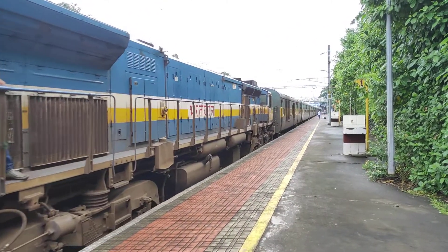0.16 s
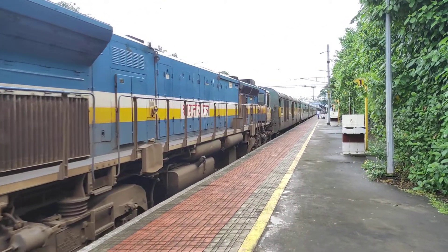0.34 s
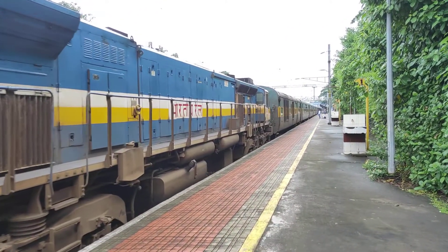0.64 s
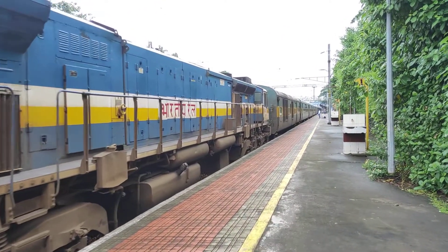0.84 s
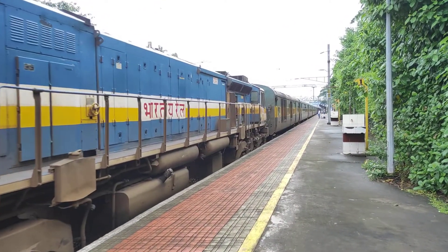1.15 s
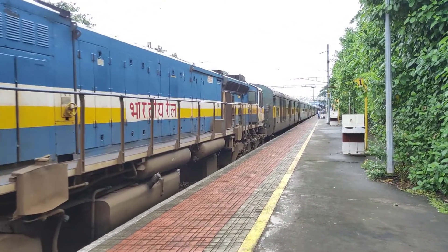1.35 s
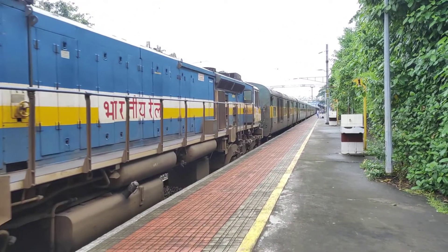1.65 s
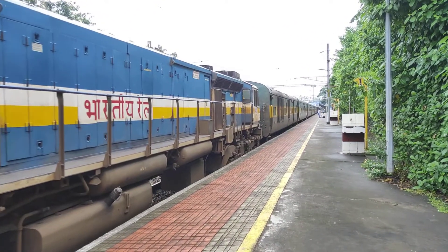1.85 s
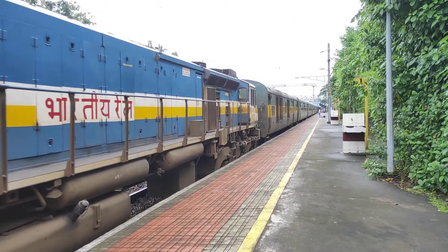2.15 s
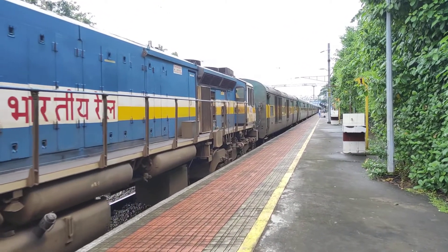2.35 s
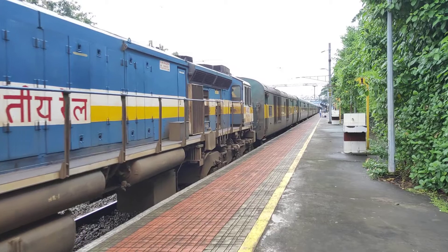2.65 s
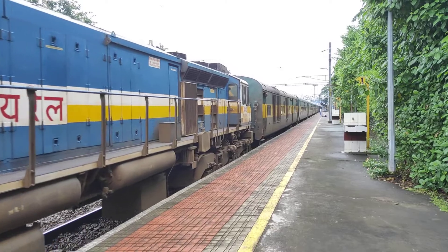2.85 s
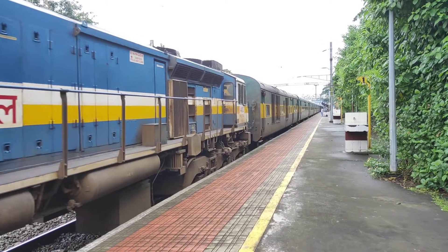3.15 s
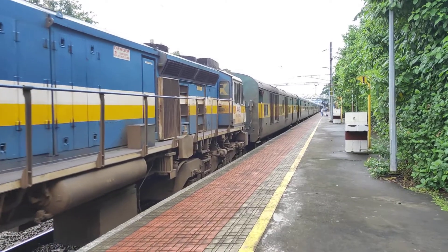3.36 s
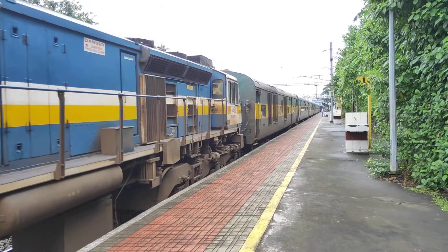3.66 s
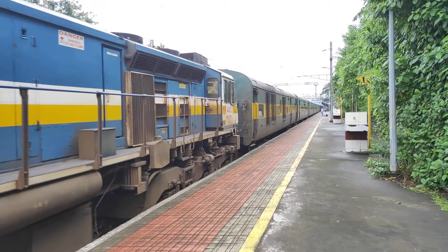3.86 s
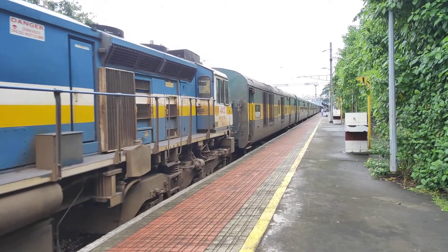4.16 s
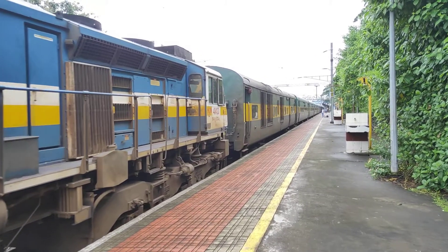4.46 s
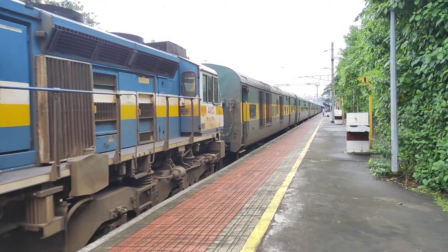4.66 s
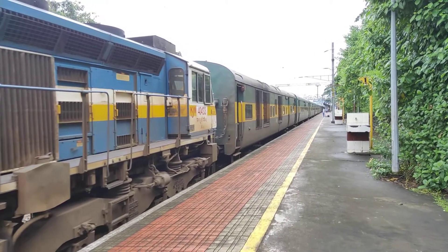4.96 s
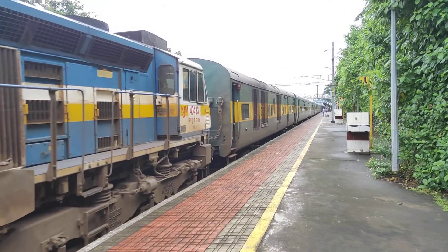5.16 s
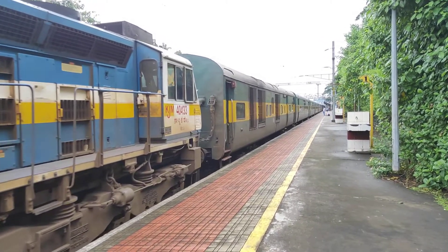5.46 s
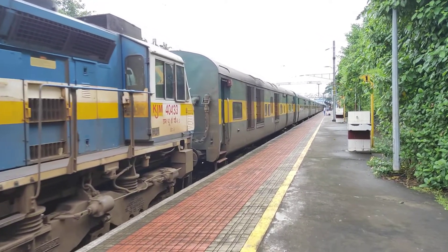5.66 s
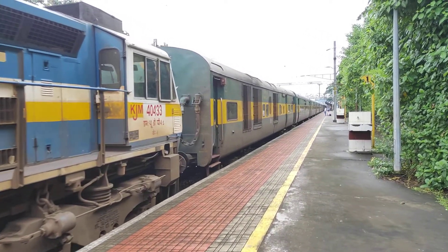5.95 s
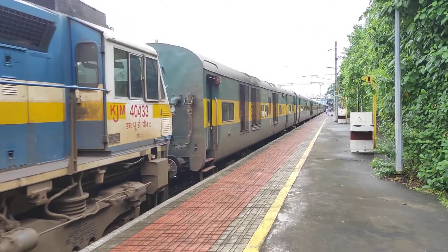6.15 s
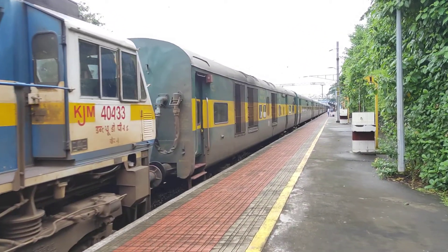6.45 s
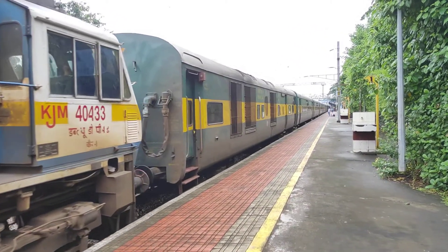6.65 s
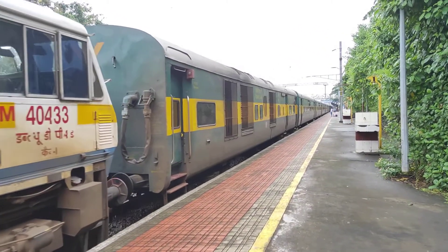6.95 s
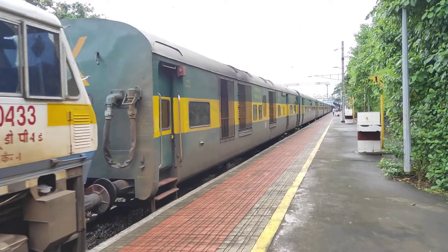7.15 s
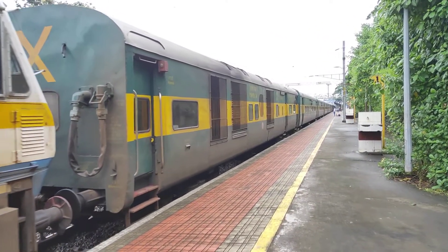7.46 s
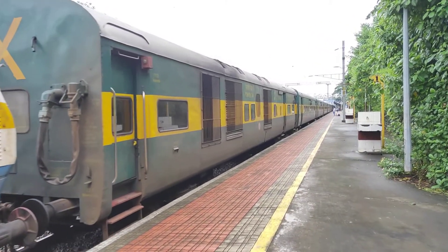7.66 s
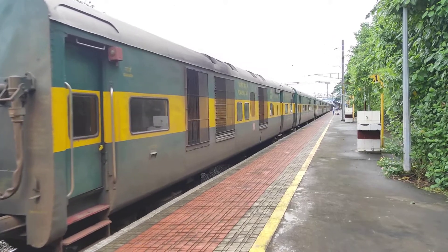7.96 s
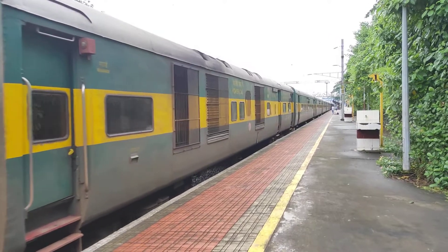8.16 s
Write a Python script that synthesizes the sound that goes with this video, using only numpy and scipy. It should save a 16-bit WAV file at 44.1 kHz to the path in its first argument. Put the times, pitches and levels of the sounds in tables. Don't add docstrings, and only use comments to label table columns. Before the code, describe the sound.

Outdoors on a platform, a phone held close hears a big diesel locomotive pull slowly past. Deep exhaust booms and thick engine roar rev up for about a second, then sink. A breathy high turbo whine follows the same pitch, with grinding running gear and rushing fan air. Late on, a sharp gear whistle flares in bursts after a tiny air puff, and the roar thins.

```python
import sys
import numpy as np
from scipy import signal
from scipy.fft import rfft, irfft, next_fast_len
from scipy.io import wavfile
from scipy.ndimage import uniform_filter1d, map_coordinates

SR = 44100
rng = np.random.default_rng(int(sys.argv[2]) if len(sys.argv) > 2 else 0)


def store_pcm(level_fs):
    pcm = np.round(np.clip(level_fs, -1, 1) * 32767).astype(np.int16)
    wavfile.write(sys.argv[1], SR, np.atleast_2d(pcm).T)


def volts_from_db(level):
    exponent = np.asarray(level, float) / 20
    return 10 ** exponent


N = 366471
T = np.arange(N) / SR
SIZE = next_fast_len(N)
BINS_HZ = np.maximum(np.fft.rfftfreq(SIZE, 1 / SR), 1)


def curves(table):
    s, *columns = np.transpose(table)
    return [np.interp(T, s, c) for c in columns]


def on_bins(table):
    hz, value = np.transpose(table)
    return np.interp(np.log(BINS_HZ), np.log(hz), value)


def walk(rate):
    held = int(SR / rate)
    levels = np.repeat(rng.standard_normal(N // held + 2), held)
    return 1.49 * uniform_filter1d(uniform_filter1d(levels, held), held)[:N]


def bump(at, lasting, order=2):
    return np.exp(-np.abs((T - at) / lasting) ** order)


def swells(rows, floor_db, order=2):
    return volts_from_db(floor_db) + sum(volts_from_db(db) * bump(at, lasting, order) for at, lasting, db in rows)


def passing(rows):
    return 10 * np.log10(sum(volts_from_db(db) ** 2 / (1 + ((T - at) / reach) ** 2) for at, reach, db in rows))


def tone(turns, width_hz, steady, like):
    pole = np.exp(-2 * np.pi * width_hz / SR)
    noise = rng.standard_normal((2, N + SR)) + 1j * rng.standard_normal((2, N + SR))
    noise = signal.lfilter([1], np.poly([pole, pole]), noise)[:, SR:]
    noise = noise / np.sqrt(np.mean(np.abs(noise) ** 2))
    steady, like = np.clip([steady, like], 0, 1)
    noise[0] = like * noise[1] + np.sqrt(1 - like ** 2) * noise[0]
    start = np.exp(2j * np.pi * rng.random())
    envelope = steady * start + np.sqrt(1 - steady ** 2) * noise
    return np.sqrt(2) * np.real(envelope * np.exp(2j * np.pi * turns))


def roar(colour, db, flicker_db, rate):
    # f/Hz, share [0-1]
    port_likeness = [(60, .99), (200, .96), (350, .9), (600, .75), (1000, .4), (1500, .45), (2200, .3),
                     (3000, .3), (5000, .1)]
    right, other = rfft(rng.standard_normal((2, SIZE))) * volts_from_db(on_bins(colour))
    like = np.clip(on_bins(port_likeness), 0, 1)
    both = np.array([like * right + np.sqrt(1 - like ** 2) * other, right])
    octave = np.log2(BINS_HZ)
    lowest, highest = np.floor(np.log2(colour[0][0])), np.log2(colour[-1][0])
    out = 0
    for centre in np.arange(lowest, highest + .5, .5):
        share = np.clip(1 - np.abs(octave - centre) / .5, 0, 1)
        out = out + irfft(both * share, SIZE)[:, :N] * volts_from_db(flicker_db * walk(rate))
    return out / np.sqrt(np.mean(out[1] ** 2)) * volts_from_db(db)


def engine_cycles():
    # t/s, cycle rate f/Hz
    speed = [(0.0, 7.002), (0.25, 7.235), (0.5, 7.553), (0.75, 7.816), (1.0, 8.052), (1.25, 8.131),
             (1.5, 8.084), (2.0, 7.904), (2.5, 7.751), (3.0, 7.493), (4.5, 6.725), (5.0, 6.559),
             (5.5, 6.355), (6.0, 6.101), (6.5, 5.934), (7.0, 5.849), (7.5, 5.789), (8.25, 5.751)]
    return np.cumsum(curves(speed)[0]) / SR


def exhaust(cycle):
    # loudest at t/s, lasting/s, level/dB rms
    booms = [
        [(3.9, 0.7, -51)],
        [(0., 0.6, -29), (2.8, 1.6, -27.5), (5.4, 0.99, -35.5)],
        [(1.9, 2.5, -31.5), (5.8, 0.59, -38.5)],
        [(1.6, 2., -32)],
        [(1.2, 0.71, -23.5), (2.8, 0.64, -38.5), (4.15, .4, -28.5)],
        [(0., .5, -35), (1.6, .8, -33), (4.1, 1.4, -27)],
        [(.7, .7, -23), (6.5, 2.8, -33)],
        [(2., 1.2, -36)],
        [(0., 0.54, -17), (2.5, 0.85, -37), (4.8, 0.35, -45), (6.4, 0.37, -31), (7.4, 1.2, -22)],
        [(0., 1., -35), (6.8, 2.7, -36)],
        [(0., .4, -30), (1.25, 0.62, -24), (5.6, 0.89, -33), (8., 0.81, -28.5)],
        [(0., 0.69, -50)],
    ]
    out = 0
    for order, rows in enumerate(booms, 7):
        wobble = .05 * walk(2)
        gain = swells(rows, -50) * volts_from_db(0.39 * walk(2.18))
        out = out + gain * np.sqrt(2) * np.sin(2 * np.pi * (order * cycle + wobble + rng.random()))
    for order in range(19, 95):
        level_db = -43.5 - 0.078 * (order - 9.5) + 3.5 * walk(1.553)
        out = out + volts_from_db(level_db) * np.sin(2 * np.pi * (order * cycle + rng.random()))
    return out


def engine_bodies():
    # f/Hz, level/dB
    body_colour = [(30, -9), (45, -12.5), (80, -3.5), (150, 0.5), (250, -3), (400, -8.5), (560, -7.5),
                   (700, -1), (850, -7), (1100, -24), (1500, -59)]
    # abreast at t/s, reach/s, level/dB when abreast
    blocks = [
        (1.4, 1.29, -25),
        (5.4, 1.76, -24.5),
    ]
    return roar(body_colour, passing(blocks) + 2, 0.86, 6)


def turbocharger(cycle):
    # loudest at t/s, lasting/s, level/dB
    glimpses = [(1., 0.7, -54), (1.85, 0.093, -41), (2.25, .2, -45.5), (2.6, .09, -41), (3.55, 0.07, -46),
                (4., 0.41, -56), (4.9, 0.17, -38), (5.45, 0.4, -38.5), (5.97, 0.14, -36),
                (6.26, 0.11, -25.5), (6.53, 0.088, -32), (6.75, .11, -28), (7.1, 0.15, -34),
                (7.44, 0.093, -34.5), (7.75, 0.14, -40), (8.15, 0.18, -37), (7.2, 2., -40.5),
                (2.6, 2.4, -50.5)]
    # loudest at t/s, lasting/s, level/dB
    idler_glimpses = [(2.3, .3, -49), (3.7, 0.38, -50), (4.5, 0.17, -48), (5., 0.24, -42.5),
                      (5.95, .25, -46.5), (6.9, 0.35, -54)]
    # t/s, level/dB
    intake = [(0., -37), (.55, -31), (1.3, -32), (2.4, -28.5), (4.2, -29.5), (4.45, -33), (5.3, -28),
              (5.7, -34.5), (6., -32.5), (6.3, -36.5), (7.3, -39), (7.7, -44.5), (8.31, -42)]
    # multiple of the cycle rate, loudest at t/s, lasting/s, level/dB
    meshes = [(157.6, 2., .5, -40), (157.6, 3.7, .5, -47), (157.6, 5.6, .6, -42), (157.6, 7.1, .7, -45),
              (225.6, .9, .15, -45), (225.6, 2.4, .6, -46), (225.6, 5., .4, -46), (315.2, 4.8, .5, -42),
              (315.2, 5.8, .4, -48), (78.5, 2.95, .2, -35), (75, 4., .3, -35), (96, 1.7, .8, -39)]
    gear = 568.8 * cycle
    blades = 881.7 * cycle
    port_turns = np.array([[-.2], [0]])

    nick_db = -6 * np.maximum(walk(60) - .5, 0)
    gear_db = 20 * np.log10(swells(glimpses, -55.5, order=4)) + 1.5 * walk(28) + nick_db
    blade_db = curves(intake)[0]
    idler_db = 20 * np.log10(swells(idler_glimpses, -47.5)) + 1.7 * walk(8.3)

    out = volts_from_db(gear_db + .5) * tone(gear + port_turns, 22, .92, .4)
    out = out + volts_from_db(gear_db - 18 - 13 * bump(1, 2.5)) * tone(2 * gear, 30, .6, .3)
    out = out + volts_from_db(blade_db - 38 + 14 * (T / T[-1]) ** 2) * tone(2.53 * gear, 300, .1, .2)
    out = out + volts_from_db(blade_db - 1.5) * tone(blades, 40, 0.66, 0.17)
    out = out + volts_from_db(blade_db - 6.0) * tone(blades, 280, 0.12, 0.14)
    out = out + volts_from_db(0.81 * blade_db - 35.0) * tone(2 * blades, 200, .2, .2)
    out = out + volts_from_db(blade_db - 24) * (T > 5.8) * tone(3 * blades, 250, .2, .2)
    out = out + volts_from_db(idler_db - 3) * tone(474.2 * cycle, 30, .3, .4)
    out = out + volts_from_db(idler_db) * tone(484.7 * cycle, 25, .4, .4)
    for multiple, at, lasting, db in meshes:
        out = out + volts_from_db(db) * bump(at, lasting) * tone(multiple * cycle, 6, .8, .6)
    return out


def machinery():
    # f/Hz, level/dB
    machine_colour = [(700, -20), (1000, 0), (1500, -4), (2100, -4), (2700, -8), (3200, -9), (3500, -13),
                      (3800, -22), (4200, -40)]
    # abreast at t/s, reach/s, level/dB when abreast
    running_gear = [
        (1.9, 1.9, -33),
        (5., 2.06, -34.5),
    ]
    return roar(machine_colour, passing(running_gear) + 3.0, 0.6, 9)


def auxiliaries():
    # f/Hz, loudest at t/s, lasting/s, level/dB
    hums = [(152.5, 7., 5.5, -29.5), (170, 8., .3, -34), (333, 1., .6, -32), (461, 2.4, .4, -28),
            (461, 3.3, .6, -37), (461, .8, .3, -40), (461, 4.4, .6, -35), (461, 6.3, .6, -42),
            (247, 6.3, .35, -36), (240, 1.8, .9, -37), (203, 4., 4., -38), (247, 7.7, .6, -34),
            (740, 2.5, .3, -32), (735, 5.2, .7, -35), (655, 1.1, .6, -36), (700, 1.7, .4, -34)]
    out = 0
    for hz, at, lasting, db in hums:
        out = out + volts_from_db(db) * bump(at, lasting) * tone(hz * T, 3, .98, 1.0)
    return out


def puff():
    # t/s, lasting/s, lift/dB
    puffs = [
        (6.07, .045, 6),
    ]
    return sum(db * bump(at, lasting) for at, lasting, db in puffs)


def fan_air(puff_db):
    # f/Hz, level/dB
    air_colour = [(3600, -30), (3950, -16), (4300, -12), (4700, -7), (5200, -7), (6000, -4), (6700, 0),
                  (7300, -5), (7800, -16), (8200, -45), (8600, -70)]
    # abreast at t/s, reach/s, level/dB when abreast
    fans = [
        (1., 3.9, -36),
        (4., 2., -36.5),
        (5.25, 0.22, -35),
    ]
    shadow_db = 1.5 * np.maximum(T - 5.55, 0)
    return roar(air_colour, passing(fans) - shadow_db - 1.5 + 0.67 * puff_db, 0.94, 12)


def louvre_hiss(puff_db):
    # f/Hz, level/dB
    top_colour = [(7600, -20), (8200, 0), (9300, -2), (10300, -6), (11000, -5), (12500, -7), (15500, -7),
                  (17000, -12)]
    # loudest at t/s, reach/s, level/dB at the loudest
    louvres = [
        (0., .8, -58.5),
        (3.1, 0.5, -55.5),
        (4.8, 0.96, -49.5),
    ]
    return roar(top_colour, passing(louvres) + puff_db, 0.64, 8.9)


def scene():
    # t/s, delay [samples]
    lateness = [(0, 7.2), (2, 9.8), (2.6, 13.3), (5.5, 20.1), (8.3, 13.6)]
    cycle = engine_cycles()
    puff_db = puff()
    noise = engine_bodies() + machinery() + fan_air(puff_db) + louvre_hiss(puff_db)
    left, right = noise + exhaust(cycle) + auxiliaries()
    left = map_coordinates(left, [np.arange(N) - curves(lateness)[0]], order=3, mode="nearest")
    return np.array([left, right]) + turbocharger(cycle)


def phone_rounding(x, size=1024, count=8):
    n, k = np.arange(2 * size), np.arange(size)
    window = np.sin(np.pi * (n + .5) / (2 * size))[:, None]
    cosines = np.cos(np.pi / size * np.outer(n + .5 + size / 2, k + .5))
    basis = window * cosines * np.sqrt(2 / size)
    halves = np.pad(x, ((0, 0), (size, 2 * size - N % size))).reshape(2, -1, size)
    lines = np.concatenate([halves[:, :-1], halves[:, 1:]], axis=2) @ basis

    bands = size // count
    band_db = 10 * np.log10(np.mean(lines.reshape(2, -1, bands, count) ** 2, axis=3) + 1e-12)
    hz = (np.arange(bands) + .5) * count * SR / 2 / size
    fall_db = 45 * np.log2(hz)
    masked_db = np.maximum.accumulate(band_db + fall_db, axis=2) - fall_db - 7
    masked_db = np.maximum(masked_db, masked_db[::-1] - 7)

    patches = rng.standard_normal((lines.shape[1], bands // 4))
    patches = (patches + np.roll(patches, 1, axis=0)) / np.sqrt(2)
    patchy_db = 1.8 * np.repeat(patches, 4, axis=1)
    ceiling_db = -31.5
    faint_db = np.minimum(uniform_filter1d(band_db, size=7, axis=2) + 11.5, ceiling_db)
    step_db = np.maximum(faint_db, np.where(hz > 3300, masked_db, ceiling_db - 14)) + patchy_db
    step = volts_from_db(np.repeat(step_db, count, axis=2))
    frames = (np.round(lines / step) * step) @ basis.T
    return (frames[:, 1:, :size] + frames[:, :-1, size:]).reshape(2, -1)[:, :N]


def top_cut(x):
    return signal.sosfilt(signal.butter(12, 15670, fs=SR, output="sos"), x)


def record(dry):
    # f/Hz, level/dB
    shade = [(60, 1.5), (300, -0.5), (1300, -0.5), (3200, -1.5), (3600, -1.5), (4000, 1.5), (5000, -20.5),
             (6000, -20), (6600, -31), (7600, -14), (8400, -8), (10000, -12), (12600, -1), (15500, -12)]
    # t/s, level/dB
    balance = [(0.0, -0.023), (0.62, 0.081), (2.2, -0.36), (4.12, 0.38), (4.65, -0.28), (5.78, 0.45),
               (6.27, 0.53), (7.24, 0.28), (8.31, -0.41)]
    left = irfft(rfft(dry[0], SIZE) * volts_from_db(on_bins(shade)), SIZE)[:N]
    pan_db = curves(balance)[0]
    ports = np.array([left * volts_from_db(pan_db / 2 + 0.03), dry[1] * volts_from_db(-pan_db / 2 + 0.71)])
    mix = phone_rounding(ports)
    return top_cut(mix)


dry = scene()
out = record(dry)
store_pcm(out)
```